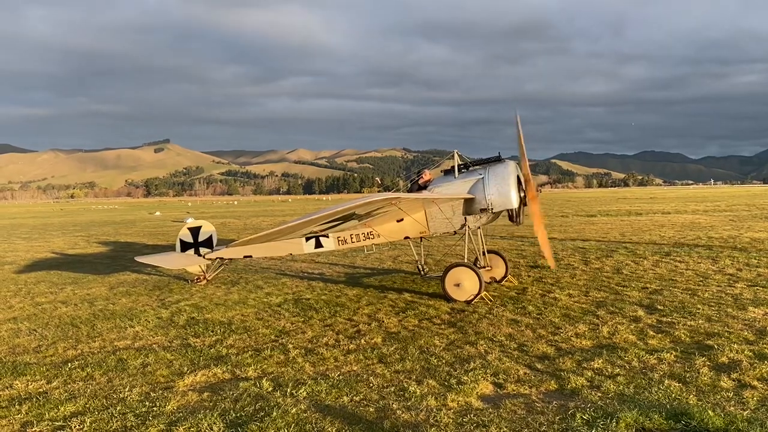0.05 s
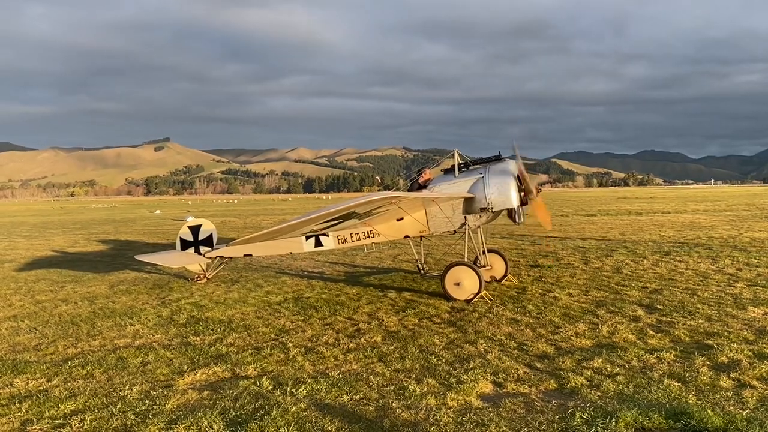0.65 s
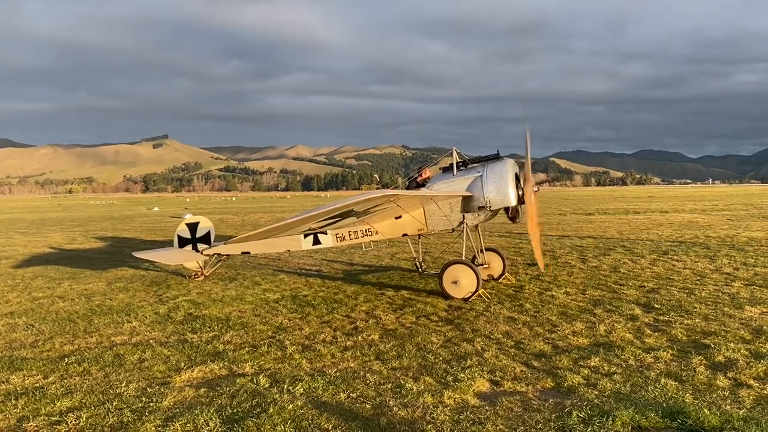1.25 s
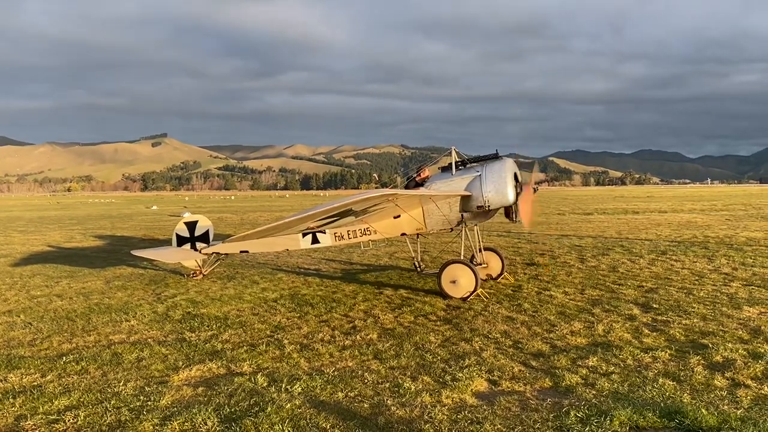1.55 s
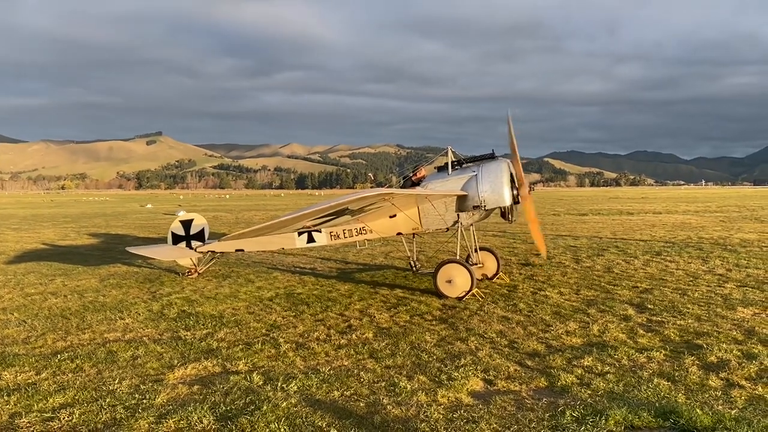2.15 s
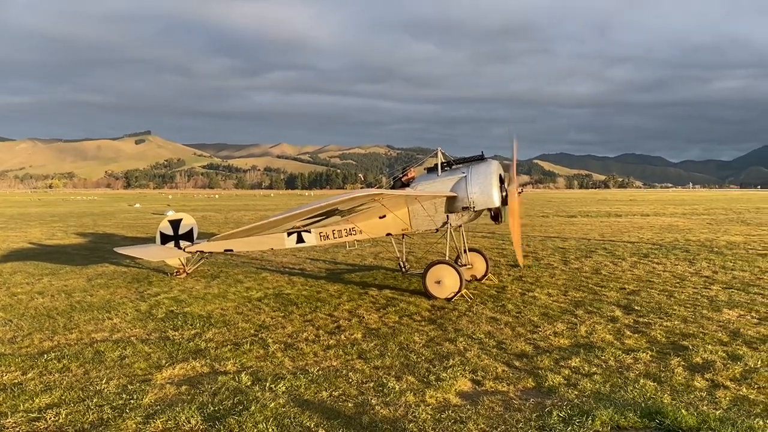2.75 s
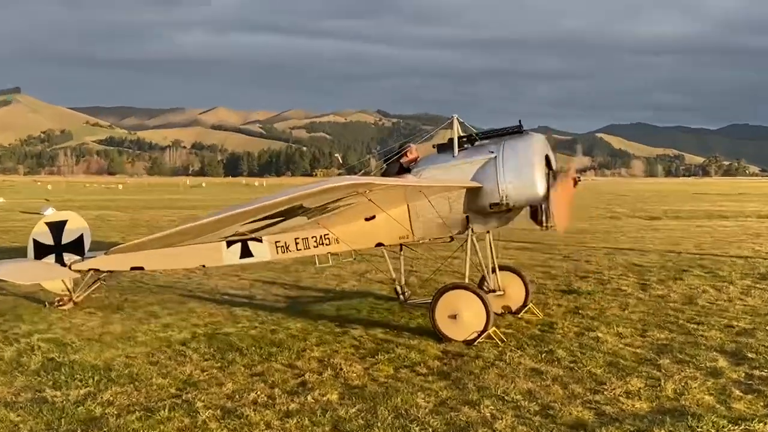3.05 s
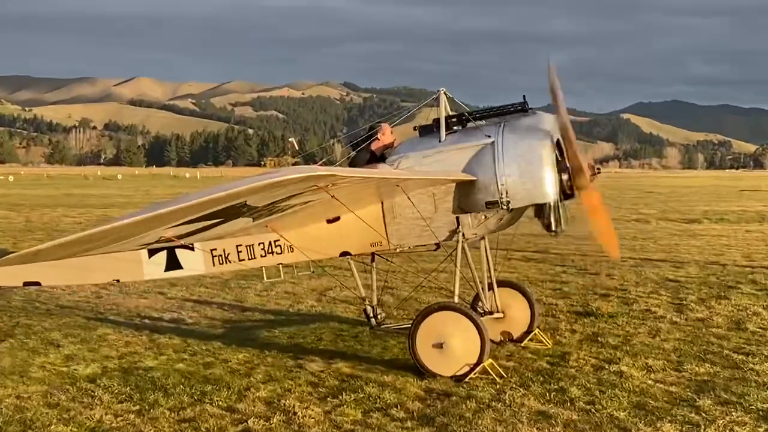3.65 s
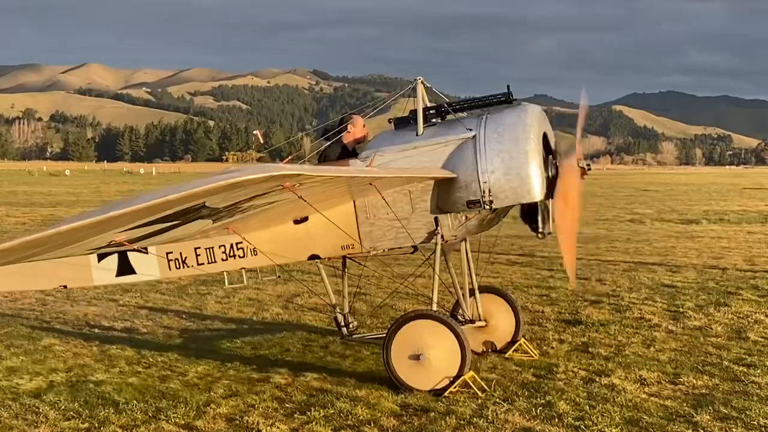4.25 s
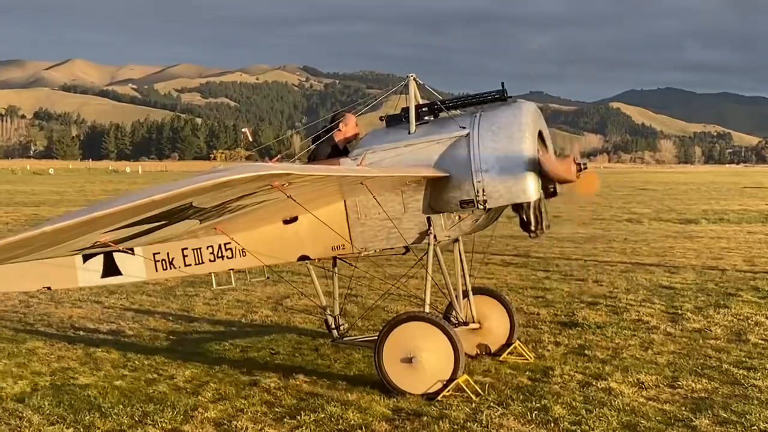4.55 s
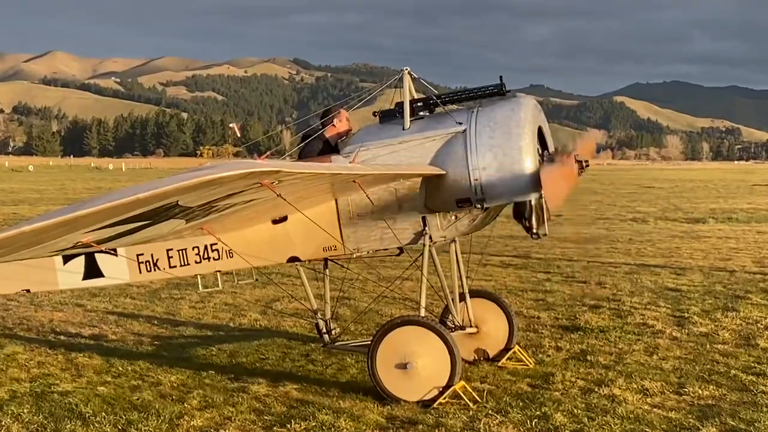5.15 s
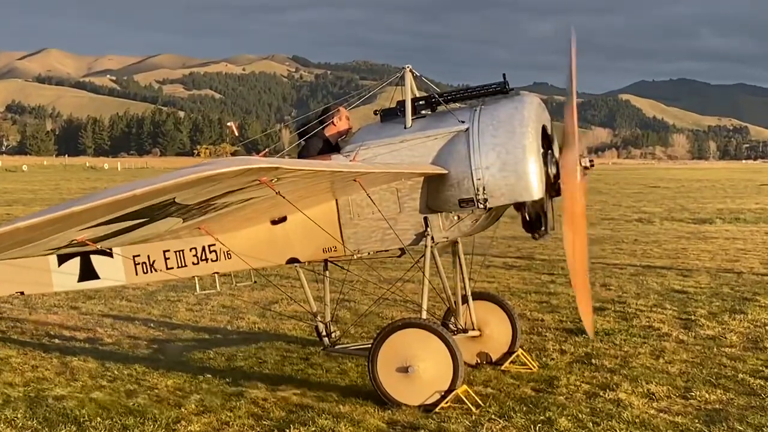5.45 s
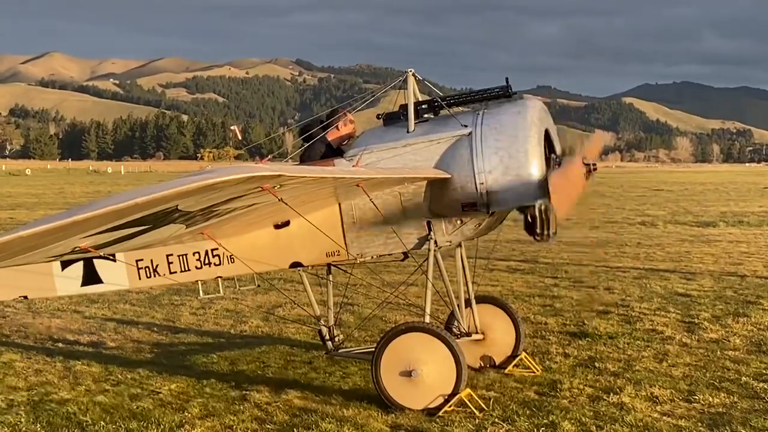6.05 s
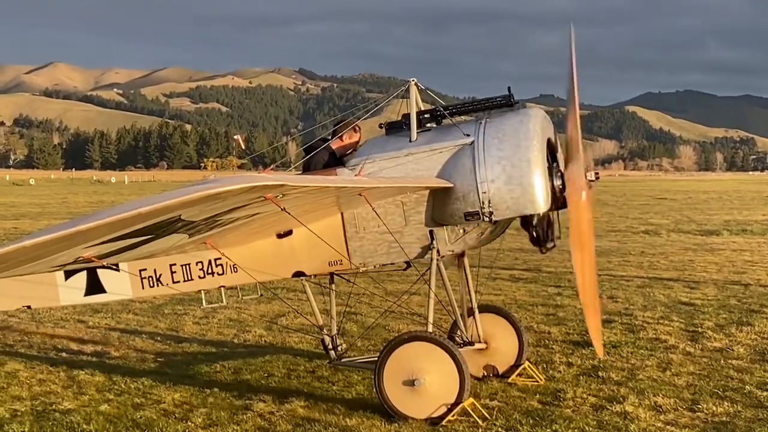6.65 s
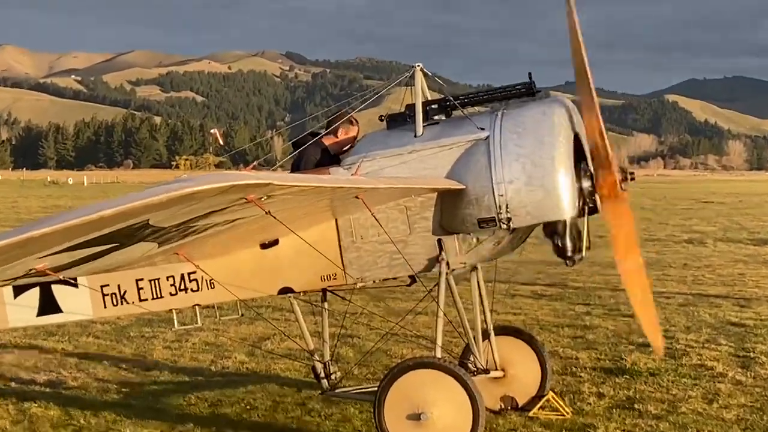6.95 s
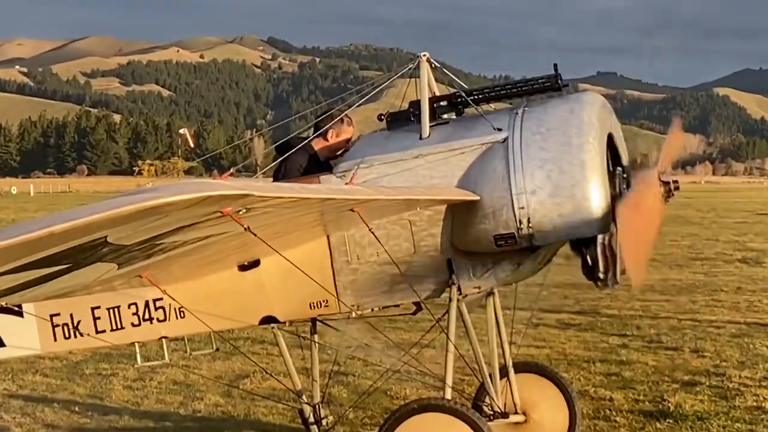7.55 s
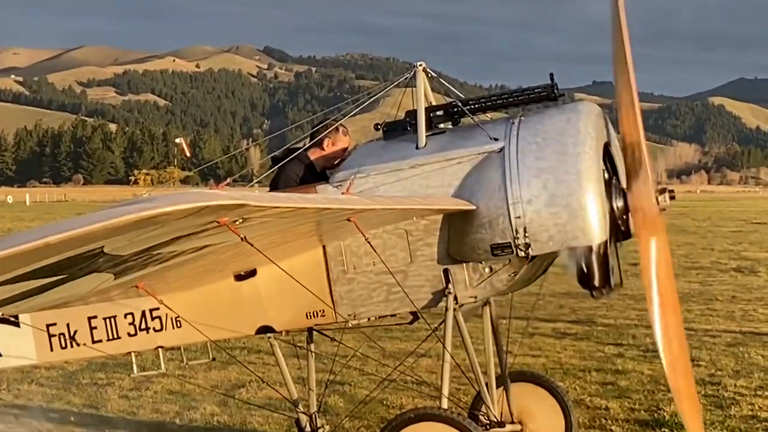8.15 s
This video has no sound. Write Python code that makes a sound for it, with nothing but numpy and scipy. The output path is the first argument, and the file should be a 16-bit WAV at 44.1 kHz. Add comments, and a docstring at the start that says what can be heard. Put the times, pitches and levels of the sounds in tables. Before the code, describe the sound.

A vintage rotary aircraft engine runs with a loud, barking buzz, twice cutting out to a hissing coast before catching again.

```python
"""A grass airfield, side-on to a nine-cylinder rotary aircraft engine barking through open exhaust ports.
Each firing is a thump of gas, a burst of jet noise and a ring of metal. Twice the pilot cuts the
ignition for over a second: the engine coasts down, hissing and whining, then catches and gathers speed.
A camera's microphone pair hears it directly and off the grass, narrowing as it zooms in at 3 s."""
import sys
import numpy as np
from scipy import signal
from scipy.fft import rfft, irfft, next_fast_len
from scipy.io import wavfile
from scipy.ndimage import uniform_filter1d, map_coordinates

SR = 44100
rng = np.random.default_rng(int(sys.argv[2]) if len(sys.argv) > 2 else 0)


def master(y):
    """Save y as 16-bit WAV."""
    cut = np.clip(np.atleast_2d(y).T, -1, 1)
    pcm = np.round(cut * 32767)  # scale
    wavfile.write(sys.argv[1], SR, pcm.astype(np.int16))


N = 369999
TIME = np.arange(N) / SR
FULL_HZ = 81  # firing rate at full speed


# Spells with the ignition on. Each row: first firing and cut in seconds, rate the mixture sustains in Hz.
IGNITION = [(0, .068, 80.5), (.088, 4.116, 80.5), (5.203, 5.697, 84.55), (6.924, 7.015, 82.7),
            (7.041, 8.5, 82.7)]
def firing_rate(spin_up_s=0.892, warming_hz_per_s=0.234, coast_ports=133.8):
    """Ports passing per second: the engine gathers speed while lit; propeller drag slows it when cut."""
    rate = np.full(N, IGNITION[0][2])
    for first, cut, sustained_hz in IGNITION:
        goal = sustained_hz + warming_hz_per_s * TIME
        shortfall = np.interp(first, TIME, goal - rate)
        rate = np.where(TIME >= first, goal - shortfall * np.exp((first - TIME) / spin_up_s), rate)
        at_cut = np.interp(cut, TIME, rate)
        rate = np.where(TIME > cut, at_cut / (1 + at_cut * np.abs(TIME - cut) / coast_ports), rate)
    return rate


def crank(rate):
    """The count of ports passed (whole when one is wide open), and whether that port fires."""
    count = np.cumsum(rate) / SR
    lit = np.zeros(N)
    for first, cut, _ in IGNITION:
        at_first = np.interp(first, TIME, count)
        since = count - at_first
        started = since > -0.5
        count = np.where(started, since + np.ceil(at_first), count)
        lit[started & (np.round(since) <= np.interp(cut, TIME, since))] = 1
    return count, lit


def exhaust(rate, count, lit):
    """The open ports under power: every firing thumps, barks, crackles and rings the metal."""
    flooded = lagged(1 - lit, seconds=1.36)  # fuel pools during a cut and burns away afterwards
    surge_db = 0.08 * wobble(5.6)  # uneven combustion
    thump_db = speed_db(rate, full=-18.5, per_octave=3.9) + 0.93 * flooded
    bark_db = speed_db(rate, full=-29.5, per_octave=2) + 2.7 * flooded
    crackle_db = speed_db(rate, full=-23, per_octave=0.65) + 2.1 * flooded
    angle = count - np.round(count)
    offset = angle / rate + 0.00017 * wobble(80)  # the charge burns a little early or late
    speed = rate / rate.max()
    charge = lit * strengths(count, own_db=-0.7, chance_db=-0.32)
    thumps = amp(thump_db) * thump(charge, count, lit)
    valve_open = lit * (angle > -0.27)
    jet = valve_open * strengths(count, own_db=-0.35, chance_db=0.5)
    # gas leaks on between blasts; a slow engine's blasts stand further out of it
    leak = speed * np.minimum(1, 2 * lagged(valve_open, seconds=0.0071))
    ring = metal_ring(charge * speed ** 2, count, lit)
    blasts = amp(bark_db) * (bark(jet, leak, offset, lit) + amp(-10) * ring)
    blasts += amp(crackle_db) * crackle(jet * crackle_gain(count), leak, offset, lit)
    return amp(surge_db) * (thumps + mixture_drive() * blasts)


# One port's gas puff. Each entry: level in dB at 1, 2, 3 .. times the firing rate.
PUFF_HARMONICS = [-0.5, -2, -12.5, -18.5, -16]
# The cowling's boom. Each row: frequency in Hz, level in dB.
COWLING_COLOUR = [(20, -28), (40, -35), (52, -9.5), (68, 1.5), (100, 0.5), (160, -1), (185, -1), (215, 8),
                  (243, 3), (290, -32.5), (400, -26), (1000, -49)]
def thump(charge, count, lit):
    """A low puff with a little rumble; it follows the valve, so it shortens as the engine speeds up."""
    puff = sum(amp(db) * (np.cos(np.pi * k) - np.cos(2 * np.pi * k * count))
               for k, db in enumerate(PUFF_HARMONICS, 1))
    boom = unit_while_lit(coloured(charge * puff, COWLING_COLOUR), lit)
    return boom + amp(-15) * lagged(charge, seconds=0.0038) * noise(RUMBLE_COLOUR)


# The midrange of the exhaust jet. Each row: frequency in Hz, level in dB.
BARK_COLOUR = [(100, -15.5), (280, 0.5), (390, -1.5), (520, 1.5), (720, 2), (950, -1.5), (1200, -2.5),
               (1500, -3.5), (1800, 1), (2100, -2), (2900, -3), (3800, -43), (8000, -47.5)]
def bark(jet, leak, offset, lit):
    """Turbulent gas bursts from each port straight into the open air."""
    flow = jet * blast(offset + 0.0005, rise=0.001, fall=0.0026) + 0.4 * leak
    return unit_while_lit(coloured(flow * turbulence(patchy_db=1.5), BARK_COLOUR), lit)


# The treble of the exhaust jet. Each row: frequency in Hz, level in dB.
CRACKLE_COLOUR = [(1200, -57.5), (2600, -13), (3300, 1), (4500, 1), (6000, 1), (7500, 0), (9000, -5.5),
                  (12000, -3), (15800, -9.5)]
def crackle(jet, leak, offset, lit):
    """The fast jet breaks into small shocks."""
    flow = jet * blast(offset + 0.00048, rise=0.0019, fall=0.0012) + 0.79 * leak
    shocks = turbulence(patchy_db=2) * amp(1.44 * wobble(2500))
    return unit_while_lit(coloured(flow * shocks, CRACKLE_COLOUR), lit)


# Firings that crack out harder than the rest. Each row: time in seconds, extra crackle in dB.
HARD_FIRINGS = [(5.222, 8.5), (5.547, 1), (5.69, 2), (6.994, 6), (7.062, 5), (7.084, 4), (7.105, 7)]
def crackle_gain(count, catch_db=-0.5):
    """Gain of each blast's crackle: slightly lower as the engine catches, higher for the firings that crack
    out."""
    port = np.round(count)
    catches = [(first, catch_db) for first, _, _ in IGNITION]
    return amp(sum(db * (port == port[int(s * SR)]) for s, db in HARD_FIRINGS + catches))


def mixture_drive(db_per_hz=0.35):
    """Gain set at each catch: a mixture that drives the engine harder also blasts louder."""
    drive_db = np.zeros(N)
    for first, _, sustained_hz in IGNITION:
        drive_db[TIME >= first] = db_per_hz * (sustained_hz - FULL_HZ)
    return amp(drive_db)


# Resonances of the metal around the ports. Each row: frequency in Hz, width in Hz, level in dB.
METAL_MODES = [(407, 15.5, -0.5), (495, 13, -0.5), (563, 55, 1.5), (715, 69, 1), (1720, 170, -8)]
def metal_ring(force, count, lit):
    """Each blast knocks the metal once, as its port stands wide open."""
    def modes(hz):
        return sum((-1) ** k * amp(db) * 1j * hz * width / (centre ** 2 - hz ** 2 + 1j * hz * width)
                   for k, (centre, width, db) in enumerate(METAL_MODES))
    knocks = force * np.diff(np.floor(count), prepend=0).clip(0, 1)
    return unit_while_lit(filtered(knocks, modes), lit)


def turning_sounds(rate, count, lit):
    """Air, propeller and gears sound throughout, and come into the clear when the engine coasts."""
    hot = lagged(lit, seconds=0.26)  # the cylinders blow hot gas for a moment after each cut
    offset = (count - np.round(count)) / rate
    hiss_db = speed_db(rate, full=-39.7, per_octave=9.9) + 6 * hot
    low_db = speed_db(rate, full=-38, per_octave=4.6) + 0.5 * hot
    hiss = amp(hiss_db) * cylinder_hiss(count, offset)
    lows = amp(low_db) * (pumping_puffs(count, offset) / 2 + propeller() + pumping_hum(rate, hot))
    return hiss + lows + gear_whine(rate, hot) + valve_hiss(offset)


# Air blown from the cylinders. Each row: frequency in Hz, level in dB.
HISS_COLOUR = [(200, -17), (350, 9.5), (650, 8), (1000, 3.5), (1700, 2.5), (2600, -0.5), (4200, -1),
               (4900, -1), (6000, -3), (7500, -6), (10000, -13.5), (15800, -17.5)]
def cylinder_hiss(count, offset):
    """The cylinders pump hissing air, which swells a little at each port."""
    flow = strengths(count, own_db=1.45, chance_db=1) * (blast(offset, rise=0.0013, fall=0.0027) + 9)
    return unit(flow * noise(HISS_COLOUR))


# Low, churning air. Each row: frequency in Hz, level in dB.
RUMBLE_COLOUR = [(20, -28), (45, -0.5), (70, 2.5), (115, -1), (165, -4), (215, -2.5), (300, -10.5),
                 (600, -35.5), (2000, -80)]
def propeller():
    """The propeller stirs the air into an unsteady rumble."""
    return unit(noise(RUMBLE_COLOUR) * amp(1.3 * wobble(14)))


def pumping_puffs(count, offset):
    """Each stroke pushes a soft puff into the cowling."""
    strokes = blast(offset, rise=0.00085, fall=0.0015) * strengths(count, own_db=4, chance_db=-2)
    return unit(coloured(strokes, COWLING_COLOUR))


def pumping_hum(rate, hot):
    """The cylinders hum at twice the port rate once the blasts have died away."""
    level = amp(-9 + 2.6 * wobble(7.6)) * (1 - hot)
    return level * unit(np.sin(4 * np.pi * np.cumsum(rate) / SR + 0.6 * wobble(21)))


# Muffled flares during the cuts. Each row: start in seconds, level in dB, decay time in seconds.
AFTERBURNS = [(4.193, -29, 0.005), (4.212, -24.5, 0.0052), (4.248, -25, 0.0074), (4.47, -34.5, 0.025),
              (4.784, -36.5, 0.068), (5.736, -32, 0.045), (6.044, -34.5, 0.013), (6.076, -33, 0.02),
              (6.132, -38, 0.015), (6.877, -35, 0.0071)]
# Their burble. Each row: frequency in Hz, level in dB.
BURBLE_COLOUR = [(30, -35), (90, 11), (320, 2.5), (520, -4.5), (900, -27), (3000, -57)]
def afterburns():
    """Unburnt fuel flares softly in the cowling."""
    swell = np.zeros(N)
    for start, db, decay_s in AFTERBURNS:
        age = np.maximum(TIME - start, 0) / decay_s
        swell += amp(db) * 2 * np.sqrt(age) * np.exp(-age)
    return swell * noise(BURBLE_COLOUR)


# The cowling panel that radiates the whine. Each row: frequency in Hz, gain in dB.
PANEL_COLOUR = [(420, -8), (500, -3), (600, 0), (770, 0), (830, -9), (1000, -18)]
def gear_whine(rate, hot, teeth_per_port=12):
    """Meshing teeth whine, fluttering in their backlash."""
    teeth = teeth_per_port * np.cumsum(rate) / SR
    tone = np.sin(2 * np.pi * teeth + 0.9 * wobble(30))
    whine_db = speed_db(rate, full=-51.5, per_octave=1.8) + 1.5 * hot + 3.5 * wobble(18)
    return coloured(amp(whine_db) * tone, PANEL_COLOUR)


# The thin hiss of the valves. Each row: frequency in Hz, level in dB.
VALVE_COLOUR = [(3000, -26), (4400, -10), (4900, -5), (5500, -11), (7000, -21), (12000, -62)]
def valve_hiss(offset):
    """Air squeezes past the valve seats as each port passes."""
    return amp(-53.5) * unit(blast(offset, rise=0.0015, fall=0.005) * noise(VALVE_COLOUR))


def grass_bounce(x, delay_s, share, soft_hz):
    """The direct sound plus the later, duller copy that reaches the microphones off the grass."""
    def bounce(hz):
        return share * hz / (hz + 300) * np.exp(-2j * np.pi * hz * delay_s - hz / soft_hz)
    return filtered(x, lambda hz: 1 + bounce(hz))


# Diffuse sound around the microphones. Each row: frequency in Hz, gain in dB.
SCATTER_COLOUR = [(80, -8), (300, 2), (1500, 10.5), (3500, -39), (6000, -31), (15000, -40)]
def scatter(x, reverb_s=0.1):
    """Airframe and field scatter the engine into a short tail."""
    age = TIME[:SR // 8]
    tail = rng.standard_normal(len(age)) * amp(-60 * age / reverb_s)
    return coloured(signal.fftconvolve(x, tail / np.linalg.norm(tail))[:N], SCATTER_COLOUR)


def strengths(count, own_db, chance_db):
    """Each of the nine cylinders has its own strength, and no two of its strokes are alike."""
    port = np.round(count).astype(int)
    cylinder = rng.standard_normal(size=9)[port % 9]
    return amp(own_db * cylinder + chance_db * rng.standard_normal(size=1000)[port])


def blast(offset, rise, fall):
    """Gas flow surging and falling around a port's opening; times in seconds."""
    surge = np.exp(-np.logaddexp(-offset / rise, offset / fall))
    return surge / surge.max()


def turbulence(patchy_db):
    """White noise whose colour shifts from one blast to the next."""
    spectra = signal.stft(rng.standard_normal(N), nperseg=512)[2]
    patches = uniform_filter1d(rng.standard_normal(spectra.shape), size=5, axis=0)
    patches = uniform_filter1d(patches, size=2, axis=1)
    return signal.istft(spectra * amp(patchy_db * unit(patches)), nperseg=512)[1][:N]


def speed_db(rate, full, per_octave):
    """Level in dB, falling from its full-speed value as the engine slows."""
    return full + per_octave * np.log2(rate / FULL_HZ)


def amp(db):
    """Decibels to gain."""
    return 10 ** (np.asarray(db) / 20)


def unit(x):
    """Scale to rms 1."""
    return x / np.sqrt(np.mean(x ** 2) + 1e-20)


def unit_while_lit(x, lit):
    """Scale to rms 1 over the time spent firing."""
    return unit(x) * np.sqrt(lit.mean())


def wobble(rate):
    """A smooth random curve, rate knots a second."""
    return map_coordinates(rng.standard_normal(int(N * rate / SR) + 4), [TIME * rate])


def lagged(x, seconds):
    """x rising and dying away with a time constant."""
    keep = np.exp(-1 / (seconds * SR))
    return signal.lfilter([1 - keep], [1, -keep], x)


def filtered(x, response):
    """x times a complex response of frequency."""
    size = 2 * next_fast_len(N // 2 + 8192)
    return irfft(rfft(x, size) * response(np.fft.rfftfreq(size, 1 / SR)), size)[..., :N]


def coloured(x, points):
    """x through a causal filter with the given (Hz, dB) points."""
    def response(hz):
        point_hz, db = np.transpose(points)
        cepstrum = irfft(np.log(amp(np.interp(np.log(hz + 1), np.log(point_hz), db))))
        fold = 1 + np.sign(len(cepstrum) // 2 - np.arange(len(cepstrum)))
        fold[0] = 1
        return np.exp(rfft(cepstrum * fold))
    return filtered(x, response)


def noise(points):
    """Coloured noise of rms 1."""
    return unit(coloured(rng.standard_normal(N), points))


def twisted(pair, points):
    """Turn the phase of the left channel against the right by the given (Hz, turns) points."""
    def response(hz):
        turns = np.interp(hz, *np.transpose(points))
        return np.exp(1j * np.pi * np.outer([1, -1], turns))
    return filtered(pair, response)


def scene():
    """The engine dead centre across the grass, with a little diffuse sound to the sides."""
    rate = firing_rate()
    count, lit = crank(rate)
    engine = exhaust(rate, count, lit) + turning_sounds(rate, count, lit) + afterburns()
    engine = grass_bounce(engine, delay_s=0.001238, share=0.31, soft_hz=4350)
    side = amp(-27) * scatter(engine)
    return np.array([engine + side, engine - side])


# Left and right microphones before the zoom. Each row: frequency in Hz, gain in dB.
WIDE_LEFT = [(80, -0.9), (160, 0.5), (450, 0.5), (900, -2), (1700, 1.1), (2800, -1.4), (4200, -1.4),
             (6000, -1.5), (9000, 0.1)]
WIDE_RIGHT = [(80, -0.95), (160, -0.1), (450, -0.6), (900, -2.5), (1700, -1), (2800, -1.2), (4200, -1.5),
              (6300, -6), (9000, 0.5)]
# Left microphone against right: throughout, and extra before the zoom.
# Each row: frequency in Hz, phase in turns.
PAIR_PHASE = [(7450, 0), (9000, -.5), (10700, -1), (11600, -1), (13250, -1.5), (14900, -2)]
WIDE_PHASE = [(4400, -0.013), (5000, -0.18), (5900, -0.27), (6700, 0.02)]
def record(dry):
    """The microphones narrow as the camera zooms in; their pairing twists the phase of the treble."""
    zoom = np.interp(TIME, [2.9, 3.1], [0, 1])
    side = (dry[0] - dry[1]) / 2
    wide = np.array([coloured(dry[0] + side, WIDE_LEFT), coloured(dry[1] - side, WIDE_RIGHT)])
    heard = twisted(zoom * dry + (1 - zoom) * twisted(wide, WIDE_PHASE), PAIR_PHASE)
    return filtered(heard, lambda hz: hz < 15830)


dry = scene()
out = record(dry)
master(out)
```